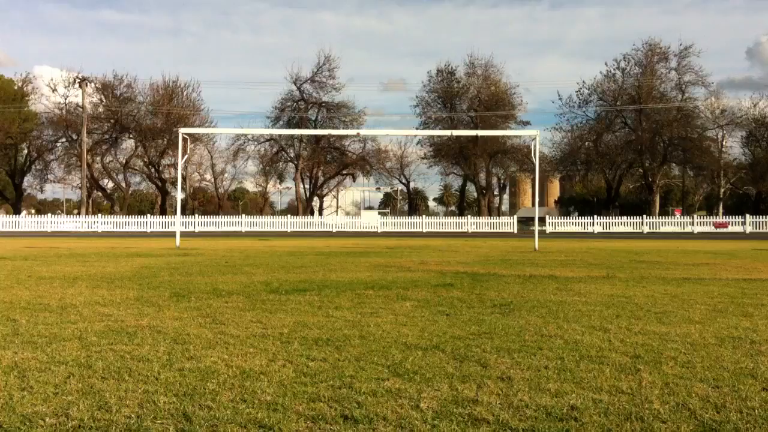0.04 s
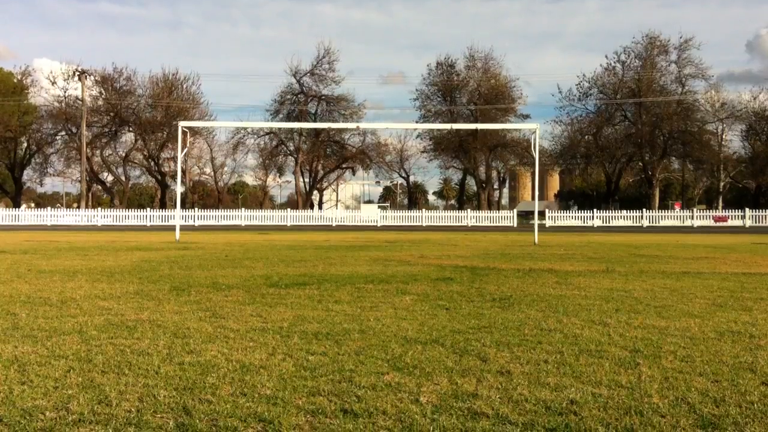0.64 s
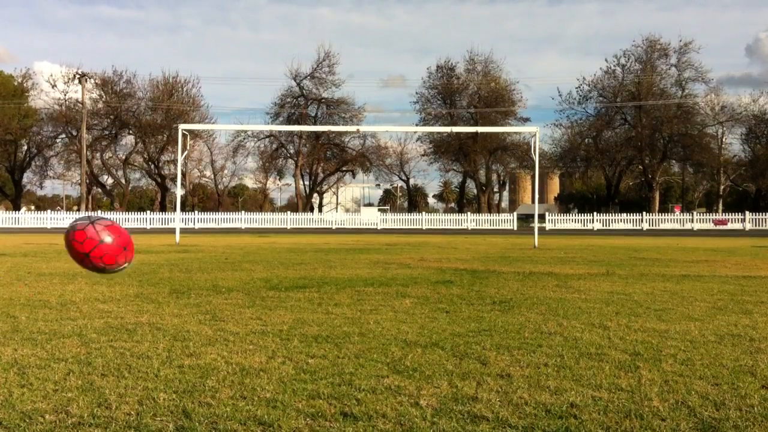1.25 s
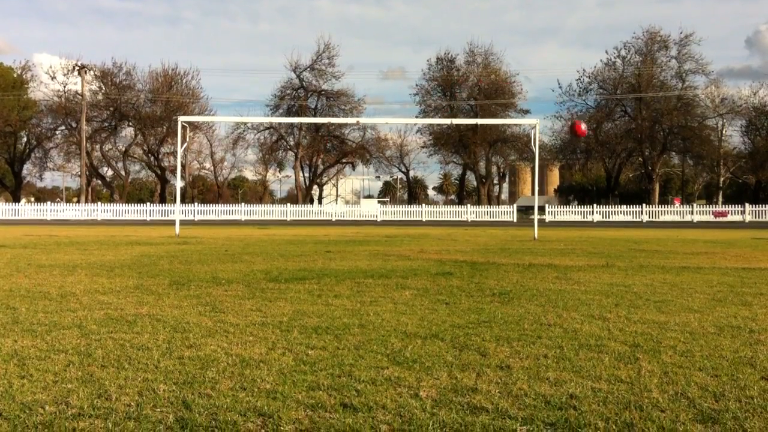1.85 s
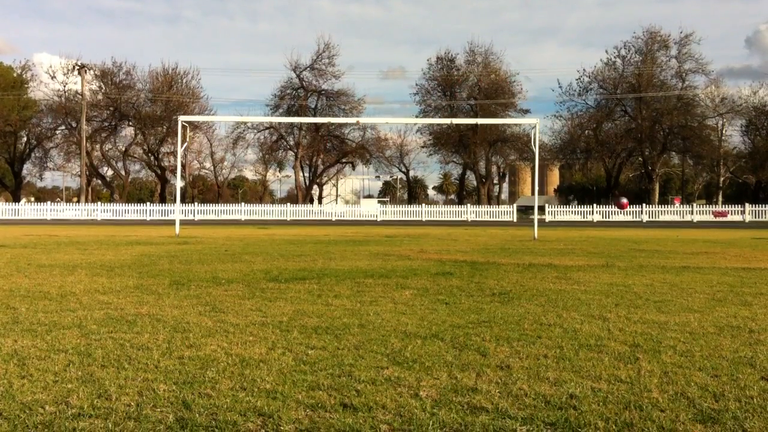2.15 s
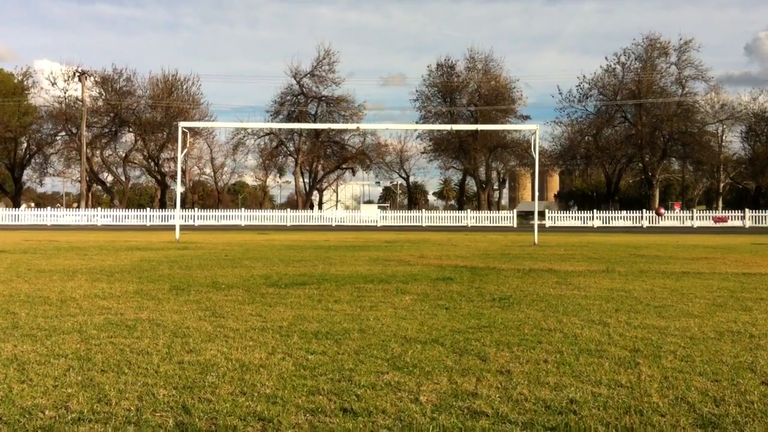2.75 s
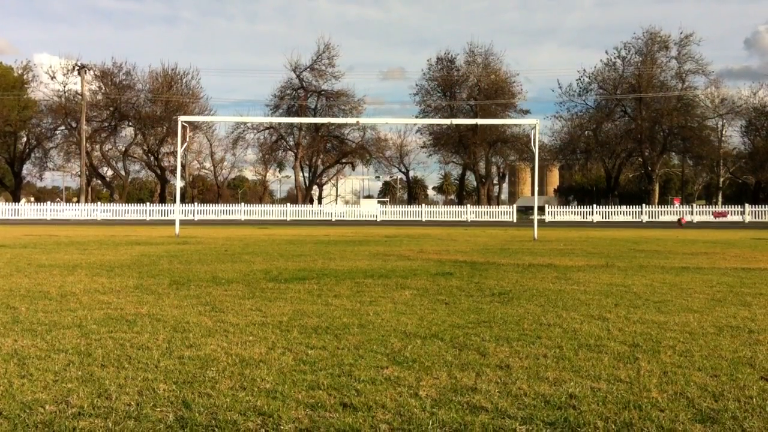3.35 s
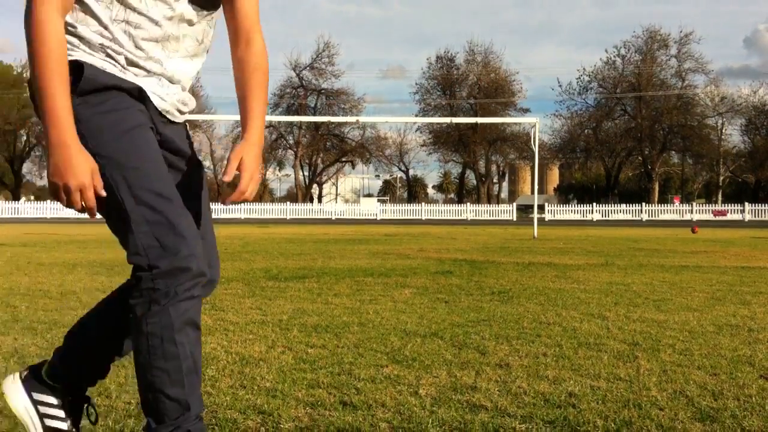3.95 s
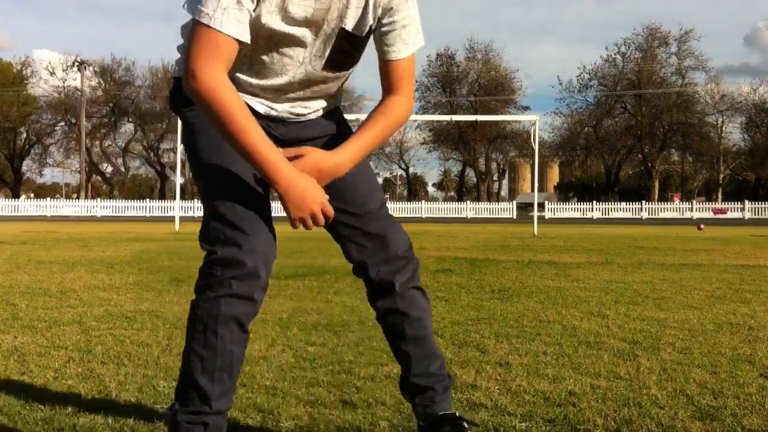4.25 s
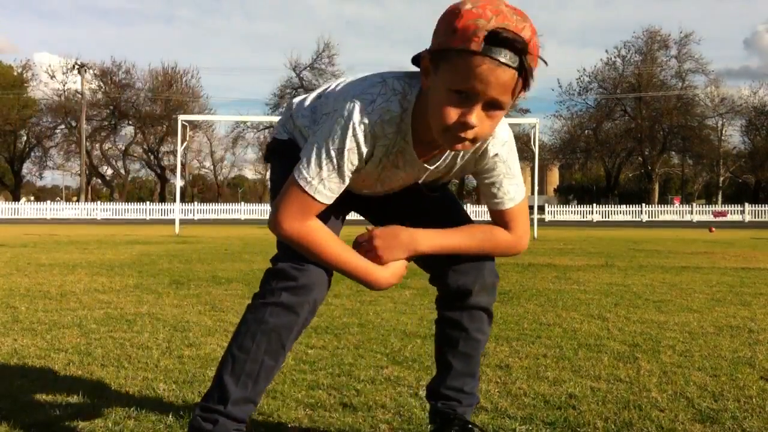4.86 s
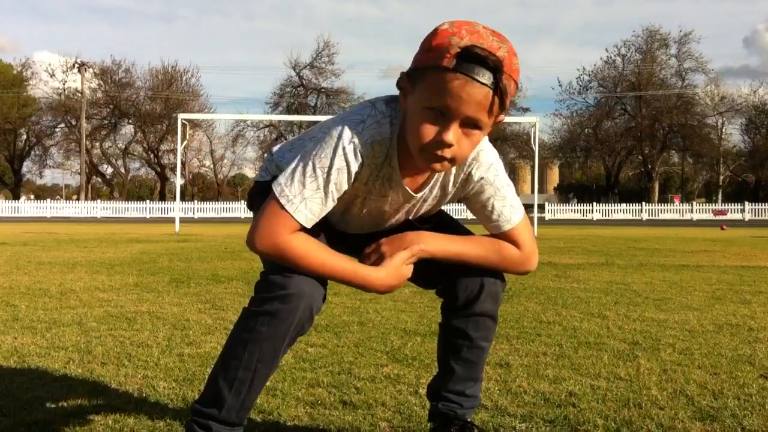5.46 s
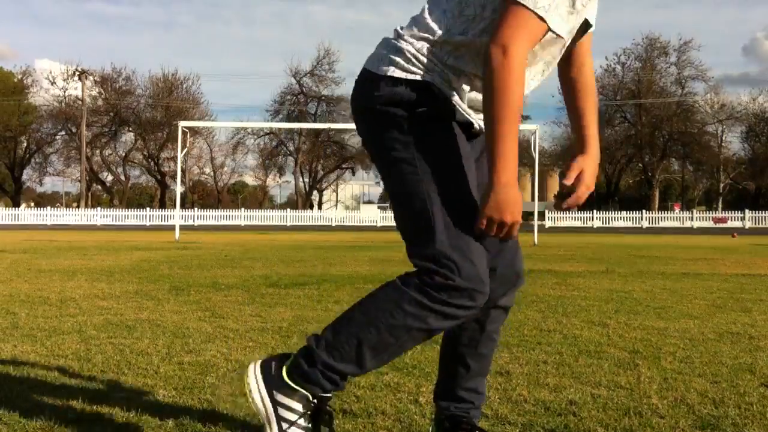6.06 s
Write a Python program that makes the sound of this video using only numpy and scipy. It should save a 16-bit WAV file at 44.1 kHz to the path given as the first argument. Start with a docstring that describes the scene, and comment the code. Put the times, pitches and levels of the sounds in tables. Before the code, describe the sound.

Wind thuds and pops on the microphone outdoors, with one close, sharp kick of a leather ball and faint distant birds.

```python
"""An open grass field, one microphone, a leather football kicked once close by.
The boot scuffs and squeaks on the leather; the ball caves in, springs back with a crack and rings.
Wind buffets the microphone in bursts of eddies; shoes, trousers and grass rustle faintly.
Further off lie a low hum, the murmur of the surroundings and a few hoarse bird calls."""
import sys
import numpy as np
from scipy import signal
from scipy.fft import rfft, irfft
from scipy.io import wavfile
from scipy.ndimage import uniform_filter1d, minimum_filter1d

SR = 44100
rng = np.random.default_rng(int(sys.argv[2]) if len(sys.argv) > 2 else 0)


def inscribe(sig):
    """Save sig as 16-bit PCM at rate SR to the path in sys.argv[1].

    A 1-D sig is mono; a 2-D sig holds one channel per row.
    Samples are clipped to [-1, 1] before scaling.
    """
    pcm = np.round(np.clip(np.atleast_2d(sig).T, -1, 1) * 32767)
    wavfile.write(sys.argv[1], SR, pcm.astype(np.int16))


N = 274302
TIME, HZ = np.arange(N) / SR, np.fft.rfftfreq(N, 1 / SR)


def gain_of(db):
    """Decibels to amplitude."""
    return 10 ** (np.asarray(db) / 20)


def unit_rms(x):
    """Scales to rms 1."""
    return x / np.sqrt(np.mean(x ** 2) + 1e-30)


def follow(curve):
    """Gain over time from rows of t/s, level/dB."""
    return gain_of(np.interp(TIME, *np.transpose(curve)))


def colour(points):
    """Magnitude at each frequency from rows of f/Hz, level/dB."""
    hz, db = np.transpose(points)
    return gain_of(np.interp(np.log(HZ + 1), np.log(hz + 1), db))


def noise(shape):
    """Noise of rms 1 with the given spectral shape."""
    return unit_rms(irfft(rfft(rng.standard_normal(N)) * shape, N))


def drift(rate_hz):
    """Random wandering of rms 1, mostly slower than rate_hz."""
    return noise(1 / (1 + (HZ / rate_hz) ** 4))


def swell(ms, half_ms):
    """A bell-shaped envelope that peaks at ms = 0."""
    return np.exp(-(ms / half_ms) ** 2 / 4)


def add(mix, s, sound):
    """Mixes a sound in from time s on."""
    start = round(s * SR)
    sound = sound[max(-start, 0):]
    part = mix[max(start, 0):][:len(sound)]
    part += sound[:len(part)]


def patchy(x, patch_db, bins=7, frames=10):
    """Lets narrow patches of a noise swell and fade on their own; returns rms 1."""
    spectra = signal.stft(x, nperseg=1024, noverlap=768)[2]
    patches = uniform_filter1d(rng.standard_normal(spectra.shape), bins, 0)
    patches = unit_rms(uniform_filter1d(patches, frames, 1))
    spectra *= gain_of(patch_db * patches)
    return unit_rms(signal.istft(spectra, nperseg=1024, noverlap=768)[1][:N])


# spectrum of the still air over the field: f/Hz, level/dB
AIR_COLOUR = [(18, -54.5), (30, -21), (60, -20), (96, -9.5), (140, 5.5), (168, 0.5), (486, -16), (871, -14),
              (969, -60.5), (1330, -14), (2590, -35), (3550, -27.5), (5020, -25.5), (7080, -29.5),
              (17000, -35.5)]
# spectrum of the murmur all around: f/Hz, level/dB
MURMUR_COLOUR = [(300, -2), (600, -11.5), (800, 3.5), (1400, 3), (1900, 0), (2600, -5.5), (3300, -12),
                 (6000, -31)]
# rise and fall of that murmur: t/s, level/dB
MURMUR_LEVEL = [(0.0, -59.5), (0.45, -57), (0.92, -56.5), (1.16, -53.5), (1.7, -59.5), (2.91, -54.5),
                (3.41, -59), (3.76, -58.5), (4.52, -63.5), (5.33, -59.5), (5.56, -64), (6.22, -58.5)]


def background(air_db=-55.5, murmur_gain_db=1, waver_db=1, hum_hz=123, hum_db=-52.5, hum_waver_hz=1.0):
    """The ambience of the field: still air, a wavering murmur and a far low hum."""
    air = gain_of(air_db) * patchy(noise(colour(AIR_COLOUR)), patch_db=1.4)
    murmur = patchy(noise(colour(MURMUR_COLOUR)), patch_db=2.2)
    murmur *= follow(MURMUR_LEVEL) * gain_of(murmur_gain_db + waver_db * drift(7.0))
    hum = np.sin(2 * np.pi * np.cumsum(hum_hz + hum_waver_hz * drift(2.0)) / SR)
    return air + murmur + gain_of(hum_db) * hum


# birds far from the microphone: t/s, length/s, level/dB, starting f/Hz, pitch rise/share of f
BIRD_CALLS = [(.12, 0.19, -53, 1100, 0.12), (.86, 0.25, -54, 1280, 0.18), (2.6, 0.18, -53, 986, 0.15),
              (2.87, .29, -50, 1318, 0.21), (3.225, 0.16, -56.5, 1594, 0.093),
              (3.681, 0.4, -60, 1577, 0.093)]


def birds(width_hz=260, gain_db=-1, upper_db=-15, upper_ratio=1.5, rattle_hz=45):
    """Distance leaves two hoarse, rattling throat resonances of each call, rising and falling."""
    out = np.zeros(N)
    rasp = drift(width_hz) + 1j * drift(width_hz)
    rasp *= 1 + .5 * np.sin(2 * np.pi * rattle_hz * TIME + drift(44))
    for s, length, db, hz, rise in BIRD_CALLS:
        now = (TIME > s) & (TIME < s + length)
        arch = abs(np.sin(np.pi * (TIME[now] - s) / length))
        angle = 2 * np.pi * np.cumsum(hz * (1 + rise * arch)) / SR
        throat = np.exp(1j * angle) + gain_of(upper_db) * np.exp(1j * upper_ratio * angle)
        out[now] += gain_of(db + gain_db) * np.sqrt(arch) * (rasp[now] * throat).real
    return out


# shoes and cloth brushing, faint at the microphone: t/s, level/dB, half-length/ms, centre f/Hz
RUSTLES = [(0.27, -64, 25, 10500), (0.52, -59, 14, 11000), (0.85, -65, 35, 10000), (1.11, -61.5, 43, 13000),
           (1.24, -52.5, 15, 9800), (1.55, -63, 45, 11500), (2.78, -60.5, 48, 11200),
           (3.277, -56.5, 5.7, 10500), (3.38, -54.5, 13, 14000), (3.49, -57.5, 33, 12900),
           (3.61, -59, 12, 13500), (3.96, -62, 25, 12000), (4.48, -68, 76, 12500), (6.16, -64, 40, 12000)]


def rustles(gain_db=-2.5, body_db=-9, grain_db=2.0, uneven_db=2.0, stir_db=-76, stir_hz=12500):
    """Short grainy swishes of grass blades and cloth over a faint, uneven stirring."""
    grain = gain_of(grain_db * drift(400) + uneven_db * drift(30))
    hiss = rfft(rng.standard_normal(N))
    body = gain_of(body_db) * HZ / (HZ + 2000)

    def hump(hz, octaves=.36):
        """A hump of treble around hz on a broad body."""
        return np.exp(-(np.log2((HZ + 1) / hz) / octaves) ** 2 / 2) + body

    out = gain_of(stir_db + 0.5 * drift(6)) * unit_rms(noise(hump(stir_hz)) * grain)
    for s, db, half_ms, hz in RUSTLES:
        swish = unit_rms(irfft(hiss * hump(hz), N) * grain)
        out += gain_of(db + gain_db) * swell(1000 * (TIME - s), half_ms) * swish
    return out


def eddy_spectrum(hz, bright_hz, cut_hz, slope=0.49):
    """A smooth pressure bump heard through the microphone's steep bass cut."""
    thinning = signal.freqs(*signal.butter(4, cut_hz, "high", analog=True), hz)[1]
    return thinning * (hz + 20) ** -slope * np.exp(-hz / bright_hz)


def puff(half_ms, bright_hz, spacing_ms=1.6, spread=0.26, skirt=0.053, size=8192):
    """A cluster of eddies of uneven strength; those at its heart are the sharpest."""
    hz = np.fft.rfftfreq(size, 1 / SR)
    jitter, push, sharpness = rng.standard_normal((3, 61))
    ms = (np.arange(-30, 31) + 0.36 * jitter) * spacing_ms
    ms -= ms[len(ms) // 2]
    envelope = swell(ms, half_ms) + skirt * np.exp(-abs(ms) / (2 * half_ms + 2))
    strength = envelope * np.sign(push) * (0.6 + abs(push))
    bright = bright_hz * np.exp(spread * np.clip(sharpness, -2, 1)) * (.5 + 0.35 * envelope)
    delay = np.exp(-2j * np.pi * hz * (ms[:, None] / 1000 + size / 2 / SR))
    eddies = strength[:, None] * eddy_spectrum(hz, bright[:, None], cut_hz=168.7) * delay
    energy = np.sqrt(2 * np.pi) * half_ms / 1000 * SR  # gives an rms near 1 at the heart
    return unit_rms(irfft(eddies.sum(0))) * np.sqrt(energy / size)


def pop(bright_hz, size=4096):
    """One eddy, pushing or sucking, with peak 1."""
    shape = eddy_spectrum(np.fft.rfftfreq(size, 1 / SR), bright_hz, cut_hz=195, slope=0.25)
    sound = np.roll(irfft(shape), size // 2)
    return rng.choice([-1, 1]) * sound / abs(sound).max()


# light draught across the microphone: t/s, level/dB
DRAUGHT = [(0.0, -44.5), (0.25, -52), (0.55, -49), (0.72, -53.5), (0.9, -40), (1.1, -47), (1.27, -39),
           (1.75, -56), (2.0, -38), (2.55, -44.5), (3.25, -50), (3.9, -44.5), (4.45, -54.5), (4.82, -53),
           (5.0, -35.5), (5.58, -38), (5.7, -47.5), (6.22, -53.5)]
# puffs striking the microphone: t/s, level/dB, half-length/ms, brightness f/Hz
PUFFS = [(0.025, -34, 5.3, 128), (0.357, -27, 4.9, 132), (0.493, -19, 8, 338), (0.531, -25, 1.7, 282),
         (0.825, -27, 8.3, 187), (1.19, -33, 6.9, 185), (1.486, -30.5, 11, 125), (1.604, -21, 7.4, 242),
         (1.875, -23, 5.2, 266), (1.897, -12, 6.1, 690), (1.999, -8.5, 9.2, 766), (2.034, -21, 1.5, 450),
         (2.06, -17.5, 6.2, 335), (2.134, -21.5, 7.4, 442), (2.165, -23.5, 2.5, 250),
         (2.238, -20, 8.2, 388), (2.259, -16.5, 11.5, 318), (2.41, -32.5, 9, 227), (2.536, -26, 13.7, 165),
         (2.979, -34, 16.5, 207), (3.389, -28.5, 4.8, 215), (3.483, -30.5, 7.8, 211),
         (3.637, -27.5, 16.5, 185), (3.75, -28, 4.5, 100), (3.801, -15, 4.9, 193), (3.96, -27, 8, 180),
         (4.022, -23.5, 2.7, 273), (4.059, -25, 8.4, 132), (4.099, -24, 5.9, 306), (4.215, -12, 3.4, 418),
         (4.241, -18, 2.6, 393), (4.283, -28, 10.8, 184), (4.328, -26, 4.1, 298), (5.012, -21.5, 9.4, 220),
         (5.04, -12.5, 6, 238), (5.066, -11.5, 5.3, 214), (5.1, -21.5, 6, 280), (5.14, -18.5, 12.2, 365),
         (5.177, -15, 8.6, 384), (5.209, -16.5, 8.3, 333), (5.247, -21, 7, 302), (5.282, -28.5, 13, 269),
         (5.383, -20.5, 4.9, 245), (5.436, -24, 6.3, 311), (5.469, -20.5, 12.7, 390), (5.522, -19, 14, 221),
         (5.6, -23.5, 6.2, 330), (5.787, -23, 8.1, 263), (5.895, -32, 20, 129), (5.974, -22.5, 9.8, 330),
         (6.204, -20, 10.2, 350)]
# the hardest eddies, popping singly right on the sound port: t/s, level/dB, brightness f/Hz
POPS = [(0.4896, -15.5, 396), (1.5955, -21.5, 313), (1.8926, -8, 1090), (1.8953, -6.5, 740),
        (1.8998, -10, 547), (1.9737, -12.5, 424), (1.984, -8.5, 520), (1.996, -4.5, 1330),
        (2.0008, -10.5, 1400), (2.0058, -2.5, 1710), (2.122, -20, 650), (2.1327, -12, 480),
        (2.2319, -14.5, 706), (2.26, -13, 398), (3.811, -11.5, 270), (4.2105, -14.5, 308),
        (4.228, -6.5, 315), (4.433, -37, 700), (4.73, -7, 218), (5.1721, -10.5, 507), (5.197, -15.5, 430),
        (5.2449, -6.5, 592), (5.2481, -8.5, 447), (5.9408, -9, 269), (5.99, -21, 350)]
# response of the sound port, which smooths the finest eddies away: f/Hz, level/dB
PORT_RESPONSE = [(40, -3), (150, 1.5), (450, 0.5), (950, 2), (1400, 2.5), (2000, 0), (2500, -2),
                 (3500, -3.5), (5000, -13.5), (6300, -27), (8000, -59)]


def wind(puff_gain_db=-1.0, draught_gain_db=0.5, lumpy_db=3.0, wake_db=-18.5, wake_s=0.042):
    """Puffs and pops over a lumpy draught that swells around each puff, all through the sound port."""
    draught = noise(abs(eddy_spectrum(HZ, bright_hz=190, cut_hz=121.0)))
    out = unit_rms(draught * gain_of(lumpy_db * drift(51)))
    wake_power = sum(gain_of(db + wake_db) ** 2 * np.exp(-2 * abs(TIME - s) / wake_s)
                     for s, db, *_ in PUFFS)
    out *= np.sqrt((follow(DRAUGHT) * gain_of(draught_gain_db)) ** 2 + wake_power)
    for s, db, half_ms, bright_hz in PUFFS:
        sound = gain_of(db + puff_gain_db) * puff(half_ms, bright_hz)
        add(out, s - len(sound) / 2 / SR, sound)
    for s, db, bright_hz in POPS:
        sound = gain_of(db) * pop(bright_hz)
        add(out, s - len(sound) / 2 / SR, sound)
    return irfft(rfft(out) * colour(PORT_RESPONSE), N)


def field_echo(x, echo_db=-22, t60=0.4):
    """Adds the thin, dull tail that grass and fence scatter back."""
    tail = noise(colour([(100, -2.5), (500, -15.0), (1400, 4.5), (3000, -6.5), (8000, -3), (16000, -23)]))
    tail *= gain_of(-60 * TIME / t60)
    return x + gain_of(echo_db) * signal.fftconvolve(x, tail / np.linalg.norm(tail))[:N]


# spectrum of the boot rubbing the leather, close by: f/Hz, level/dB
SCUFF_COLOUR = [(90, -47.5), (160, -15), (330, 4), (800, -2.5), (1250, 1), (1650, 0.5), (1980, -12),
                (2480, -14), (3100, -11), (4800, -16), (6200, -13.5), (8000, -28), (11000, -10.5),
                (13500, -26), (17000, -7)]


def scuff(start_s=1.333, rise_s=.006, hold_s=.0055, level_db=-24, fade_db_per_s=750, grain_db=2):
    """The boot presses in quickly, slides for a moment and lets go."""
    friction = unit_rms(noise(colour(SCUFF_COLOUR)) * gain_of(grain_db * drift(700)))
    t = TIME - start_s
    press = np.clip(t / rise_s, 0, 1) ** 2
    since_release = np.maximum(t - rise_s - hold_s, 0)
    return friction * press * gain_of(level_db - fade_db_per_s * since_release)


# squeaks just ahead of the first blow: t/s, level/dB, half-length/ms, f/Hz, glide/(octaves per s)
SQUEAKS = [(1.3445, -23.5, 3.5, 1200, -20), (1.3442, -21, 1.4, 2460, 0), (1.339, -27, 1.1, 2450, 0)]


def squeaks(t, slip_rad=0.51):
    """The leather squeaks in short, rough tones as the boot slips; t is the time around each one."""
    out = np.zeros(N)
    for s, db, half_ms, hz, glide in SQUEAKS:
        angle = 2 * np.pi * np.cumsum(hz * 2 ** (glide * t)) / SR + slip_rad * drift(270)[:len(t)]
        add(out, s + t[0], gain_of(db) * swell(1000 * t, half_ms) * np.sin(angle))
    return out


# ringing after each blow, a low swing near 130 Hz and the higher modes of the ball: f/Hz, level/dB, t60/s
RINGING = [(132, -8.5, 0.03), (470, -14, 0.021), (837, -14.5, 0.022), (1250, -51, .03),
           (2475, -38.5, 0.12)]
# blows on the ball, close by: t/s, pulse level/dB, pulse time/ms, crack level/dB, ring level/dB
BLOWS = [(1.355, -11.5, 0.55, -17, -7.5), (1.3746, -22, .24, -50, -11)]


def ball(t, crack_s=0.00033, lead_s=0.00091):
    """The ball caves in, springs back with a crack and rings briefly; t is the time around each blow."""
    out = np.zeros(N)
    after, since_crack = np.maximum(t, 0), t + lead_s
    ring = sum(gain_of(db - 60 * after / t60) * np.sin(2 * np.pi * hz * t) for hz, db, t60 in RINGING)
    snap = noise(colour([(500, -26), (3500, -10.0), (10000, -7), (13000, -18), (17000, -27)]))[:len(t)]
    crack = snap * np.exp(-abs(since_crack) / crack_s)
    crack *= np.sqrt(crack_s * SR / np.sum(crack ** 2))  # the same force in every crack
    front = (1 + np.tanh(since_crack / .00008)) / 2  # the blow sets in abruptly
    for s, db, pulse_ms, crack_db, ring_db in BLOWS:
        pulse_time = 1000 * t / pulse_ms
        pressure = pulse_time * np.exp((1 - pulse_time ** 2) / 2)  # suction, then a push
        blow = gain_of(db) * pressure + gain_of(ring_db) * ring + gain_of(crack_db) * crack
        add(out, s + t[0], front * blow)
    return out


def kick(cut_hz=110):
    """Boot meets ball at close range; the microphone thins the deep bass, so the thump swings back."""
    t = np.arange(-SR // 50, SR // 4) / SR
    bass_cut = signal.butter(2, cut_hz, "high", fs=SR, output="sos")
    return signal.sosfilt(bass_cut, scuff() + squeaks(t) + ball(t))


def scene():
    """The field as heard at one microphone."""
    return (wind() + field_echo(kick()) + rustles() + birds() + background())[None]


def record(dry, limiter_samples=131, edge_hz=17250):
    """A fast limiter turns the hardest gusts down to full scale; then a low-pass limits the band."""
    allowed = 1 / np.maximum(abs(dry), 1)
    gain = uniform_filter1d(minimum_filter1d(allowed, limiter_samples), limiter_samples)
    low_pass = signal.firwin(511, edge_hz, window=("kaiser", 9), fs=SR)
    return signal.oaconvolve(dry * gain, low_pass[None], "same")


dry = scene()
out = record(dry)
inscribe(out)
```